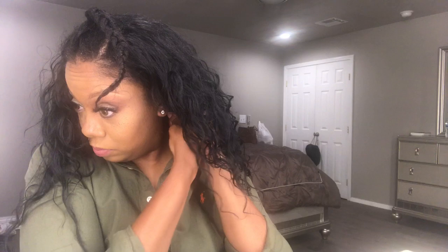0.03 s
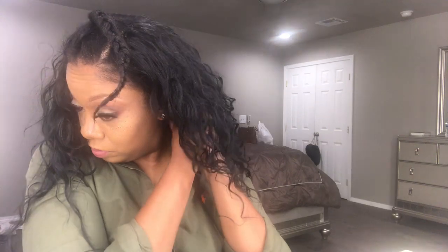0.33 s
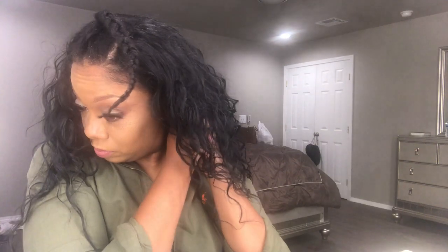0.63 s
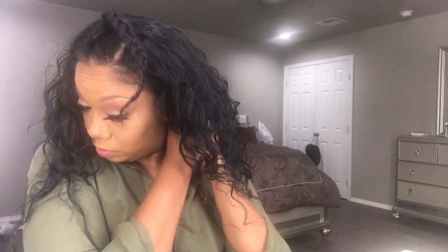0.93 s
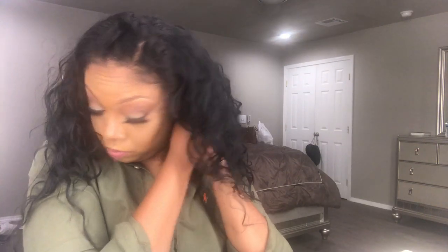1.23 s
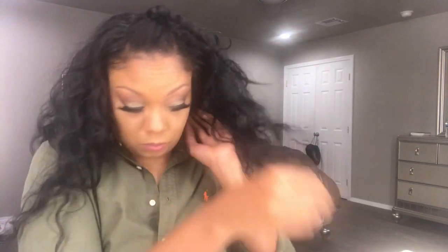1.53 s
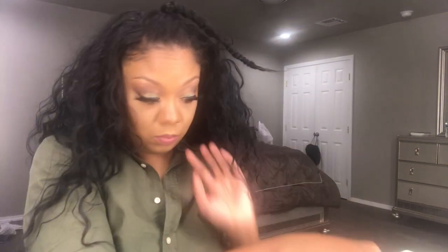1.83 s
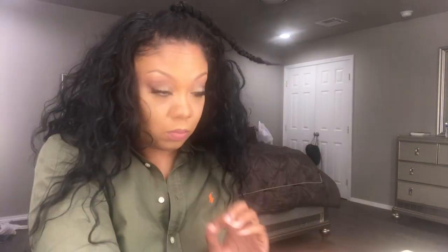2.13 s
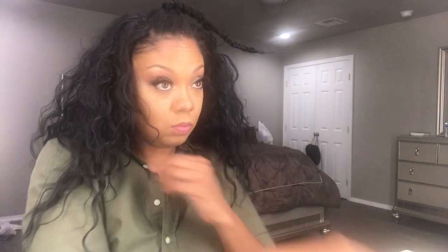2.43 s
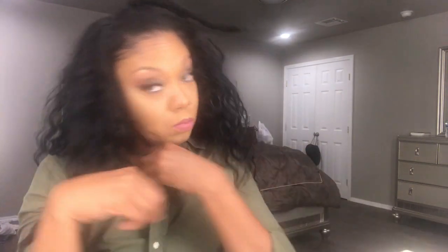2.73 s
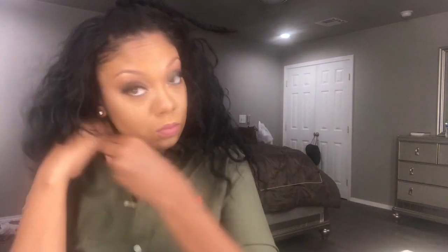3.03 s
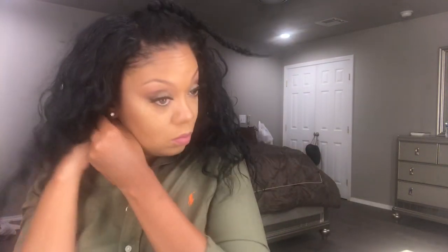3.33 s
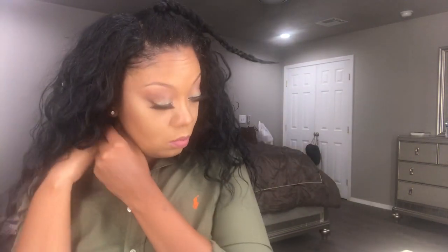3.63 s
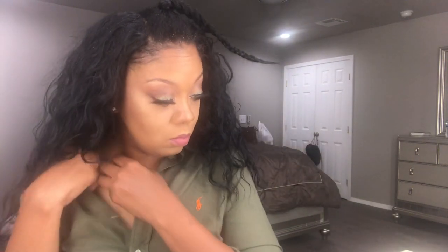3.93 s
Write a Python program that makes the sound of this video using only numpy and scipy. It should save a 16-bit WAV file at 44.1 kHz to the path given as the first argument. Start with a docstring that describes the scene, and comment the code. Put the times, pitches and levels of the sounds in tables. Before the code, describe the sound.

Soft rustling of hair and shirt sleeves being handled in a quiet, humming bedroom.

```python
"""A quiet bedroom: low rumble, a faint appliance hum and microphone hiss run throughout.
Someone gathers long hair at one side of the neck, and strands hiss through the fingers.
Just after 2 s something small clinks twice. Shirt sleeves rub as the arms cross over, and around 3 s
nails and buttons tick, nails scrape and the arms bump softly against the body.
The last strokes gather the hair on the other side."""
import sys
import numpy as np
from scipy import signal
from scipy.fft import rfft, irfft
from scipy.io import wavfile
from scipy.ndimage import uniform_filter1d

SR = 44100
rng = np.random.default_rng(int(sys.argv[2]) if len(sys.argv) > 2 else 0)


def store_wav(level_fs):
    """Save 16-bit WAV to argv[1]."""
    pcm = np.round(np.clip(np.atleast_2d(level_fs), -1, 1) * 32767)
    wavfile.write(sys.argv[1], SR, pcm.T.astype(np.int16))


N = 176400


def amp(db):
    """Decibels to gain."""
    return 10 ** (np.asarray(db) / 20)


def unit(x):
    """Scales to rms 1."""
    return x / np.sqrt(np.mean(x ** 2) + 1e-20)


def curve(points):
    """Joins (time_s, value) points by straight lines."""
    return np.interp(np.arange(N) / SR, *np.transpose(points))


def colour(x, points):
    """EQ through (freq_hz, gain_db) points."""
    hz, db = np.transpose(points)
    gain_db = np.interp(np.log(np.fft.rfftfreq(N, 1 / SR) + 1), np.log(hz), db)
    return irfft(rfft(x) * amp(gain_db), N)


def drift(rate_hz):
    """Random wander of rms 1 up to about the given rate."""
    lowpass = np.exp(-(np.fft.rfftfreq(N, 1 / SR) / rate_hz) ** 2)
    return unit(irfft(rfft(rng.standard_normal(N)) * lowpass, N))


def tone(hz):
    """A sine of rms 1 that follows a pitch curve."""
    return np.sqrt(2) * np.sin(2 * np.pi * (np.cumsum(hz) / SR + rng.random()))


def add(mix, start_s, sound):
    """Mixes a sound in at a time."""
    part = mix[round(start_s * SR):][:len(sound)]
    part += sound[:len(part)]


def bedroom(x, wet_db, t60_s=0.36):
    """The room answers with a short, soft tail after a 4 ms pre-delay."""
    t = np.arange(SR // 2) / SR
    tail = rng.standard_normal(len(t)) * amp(-60 * t / t60_s) * (t > .004)
    return x + amp(wet_db) * signal.fftconvolve(x, tail / np.linalg.norm(tail))[:N]


def reflections(x, share=0.067, latest_s=.009, count=8):
    """Echoes from nearby surfaces ripple the rustle's spectrum."""
    hz = np.fft.rfftfreq(N, 1 / SR)
    delays = rng.uniform(0.000999, latest_s, size=count)
    signs = rng.choice([-1, 1], size=count)
    echoes = sum(sign * np.exp(-2j * np.pi * hz * delay) for delay, sign in zip(delays, signs))
    return irfft(rfft(x) * (1 + share * echoes), N) / np.sqrt(1 + count * share ** 2)


# EQ of the room tone: freq_hz, gain_db
ROOM_EQ = [(20, -37), (33, -29), (45, 4), (65, -7), (85, -3), (100, -4), (140, -8.5), (190, -18.5),
           (280, -22.5), (550, -28.5), (800, -30.5), (1100, -31), (1800, -35), (2800, -38.5), (4000, -40),
           (8000, -43.5), (15500, -43)]


def room_tone(level_db=-57):
    """A steady, bass-heavy bed of room air and microphone hiss."""
    return amp(level_db) * unit(colour(rng.standard_normal(N), ROOM_EQ))


# Level rides of the deep and the upper room resonance: time_s, level_db
DEEP_RUMBLE_RIDE = [(0, -49), (.6, -55), (.81, -47), (.91, -53), (.99, -43.5), (1.2, -50), (1.5, -51.5),
                    (1.85, -61.5), (2.13, -44.5), (2.35, -56.5), (2.57, -51), (2.75, -53.5), (3.15, -60),
                    (3.35, -43.5), (3.62, -53), (4, -52)]
UPPER_RUMBLE_RIDE = [(0, -51), (.4, -65), (.75, -56.5), (1.35, -54), (1.7, -62), (2.4, -61), (3.1, -59.5),
                     (3.5, -61), (4, -61.5)]


def rumble(deep_hz=51.6, upper_hz=80.27, wander_hz=5.03, flutter_db=2.0):
    """Two narrow room resonances wander in pitch and flutter in level."""
    return sum(tone(hz + wander_hz * drift(14.5)) * amp(curve(ride) + flutter_db * drift(9.8))
               for hz, ride in [(deep_hz, DEEP_RUMBLE_RIDE), (upper_hz, UPPER_RUMBLE_RIDE)])


# Partials of the hum: pitch_hz, level_db, waver_hz
HUM_PARTIALS = [(118.54, -65, 1.4), (237.6, -79.5, 1), (332.7, -82.5, 3), (420, -86.5, 4),
                (467, -85.5, 1.3), (575, -87.5, 7.97), (784, -76, 1.5), (1014, -85.5, 3.54)]


def appliance_hum():
    """An appliance drones at a steady level, each partial wavering slightly in pitch."""
    return sum(amp(db) * tone(hz + waver * drift(8)) for hz, db, waver in HUM_PARTIALS)


# Soft body thuds: start_s, level_db, pitch_hz
ARM_BUMPS = [(2.866, -47, 145), (3.057, -54, 131), (3.191, -51, 104)]


def arm_bumps(rise_s=0.0048, overtone=0.31):
    """Arms meet the body in dull, quickly damped thuds."""
    out, t = np.zeros(N), np.arange(SR // 4) / SR
    envelope = t / rise_s * np.exp(1 - t / rise_s)
    for start, db, hz in ARM_BUMPS:
        phase = 2 * np.pi * hz * t
        add(out, start, amp(db) * envelope * (np.sin(phase) + overtone * np.sin(2.25 * phase)))
    return out


# Light clinks: start_s, level_db
CLINK_HITS = [(2.088, -71), (2.174, -56.5)]
# The ring of each clink: pitch_hz, gain_db, t60_s
RING_MODES = [(2140, 3.5, 0.032), (2440, -6, 0.046), (2872, -2, 0.12), (2960, -11, .15),
              (3210, -0.5, 0.032), (4520, -15, .15), (5300, -13, .04)]


def clinks(snap_db=-2, snap_s=0.0027):
    """A small hard object, perhaps jewellery, is knocked: a tiny snap and a brief high ring."""
    out, t = np.zeros(N), np.arange(SR // 2) / SR
    for start, db in CLINK_HITS:
        ring = sum(amp(gain - 60 * t / t60) * np.sin(2 * np.pi * (hz * t + rng.random()))
                   for hz, gain, t60 in RING_MODES)
        soft_noise = unit(uniform_filter1d(rng.standard_normal(len(t)), size=4))
        snap = amp(snap_db) * np.exp(-t / snap_s) * soft_noise
        add(out, start, amp(db) * (ring + snap))
    return out


# Nail and button ticks: start_s, level_db, centre_hz, width_octaves, t60_s
TICK_HITS = [(2.372, -64.5, 1500, 0.67, 0.045), (2.771, -56.5, 1720, .5, 0.018),
             (2.871, -60.5, 1800, 0.46, 0.18), (3.022, -52, 14300, 0.091, 0.015),
             (3.045, -54, 2600, 1.07, 0.013), (3.095, -57.5, 440, 0.13, 0.053)]


def ticks(attack_s=.0005, hold_s=.003):
    """Fingernails and buttons tap, each a short noise burst in its own band."""
    out, t = np.zeros(N), np.arange(8192) / SR
    hz = np.fft.rfftfreq(len(t), 1 / SR) + 1
    for start, db, centre, width, t60 in TICK_HITS:
        band = np.exp(-.5 * (np.log2(hz / centre) / width) ** 2)
        burst = unit(irfft(rfft(rng.standard_normal(len(t))) * band))
        envelope = np.minimum(t / attack_s, 1) * amp(db - 60 * np.maximum(t - hold_s, 0) / t60)
        add(out, start, burst * envelope)
    return out


# Thin scrapes: start_s, length_s, level_db, centre_hz, width_hz
NAIL_SCRAPES = [(.31, .07, -79, 8000, 250), (0.399, 0.014, -75, 3400, 160), (0.509, .025, -79, 3400, 160),
                (.512, .025, -77, 5870, 500), (1.367, 0.075, -75.5, 2270, 130),
                (1.35, .09, -74, 14100, 800), (2.865, 0.034, -64, 3420, 110),
                (2.869, 0.022, -70, 4400, 150), (2.906, 0.051, -69, 4280, 180),
                (2.954, 0.032, -69, 3170, 150)]


def nail_scrapes(fade_share=.3):
    """Nails skid along hair and cloth; quick, nearly regular slips give a fuzzy pitch."""
    out, hz = np.zeros(N), np.fft.rfftfreq(8192, 1 / SR)
    for start, length, db, centre, width in NAIL_SCRAPES:
        phases = np.exp(2j * np.pi * rng.random(len(hz)))
        band = irfft(phases / (1 + ((hz - centre) / width) ** 2))
        compressed = band / np.sqrt(abs(signal.hilbert(band)))  # 2:1, for a fairly even strength
        scrape = unit(compressed[:round(length * SR)])
        add(out, start, amp(db) * scrape * signal.windows.tukey(len(scrape), fade_share))
    return out


def friction(slips_per_s, spread_db, hiss, clump_db, clump_hz):
    """Tiny fibre slips of uneven size over a smooth sliding hiss, swelling in clumps."""
    sizes = amp(spread_db * np.minimum(rng.exponential(1, N), 4))
    slips = (rng.random(N) < slips_per_s / SR) * sizes * rng.choice([-1., 1.], N)
    return (unit(slips) + hiss * rng.standard_normal(N)) * amp(clump_db * drift(clump_hz))


# Level ride of the sleeves, louder for faster arms: time_s, level_db
SLEEVE_RIDE = [(0, -82.5), (1.25, -75), (1.42, -70.5), (1.6, -73.5), (1.78, -68.5), (1.95, -66),
               (2.12, -72.5), (2.28, -73.5), (2.48, -67.5), (2.6, -63.5), (2.77, -57.5), (2.96, -63),
               (3.06, -61.5), (3.2, -66), (3.3, -64.5), (3.38, -71.5), (3.6, -73), (3.8, -65), (4, -59.5)]
# EQ of the shirt cloth: freq_hz, gain_db
CLOTH_EQ = [(60, -30), (120, 7), (230, -10.5), (450, -6.5), (600, -7), (800, -5), (1000, -.5), (1220, 0.5),
            (1550, -6), (2150, -6.5), (2780, -11), (3700, -9.5), (4700, -11.5), (6000, -15.5),
            (8000, -16.5), (10000, -19.5), (15500, -19)]


def sleeves():
    """Cloth rubs on cloth as the arms move."""
    rub = friction(slips_per_s=2500, spread_db=3, hiss=1.01, clump_db=0.63, clump_hz=38)
    return unit(colour(rub, CLOTH_EQ)) * amp(curve(SLEEVE_RIDE))


# Strokes through the hair: peak_s, rise_s, fall_s, level_db, tilt_db_per_octave
HAIR_STROKES = [(.23, 0.12, 0.079, -75, 2.5), (.36, 0.071, 0.036, -70, 2.5), (.408, .012, 0.011, -69, -1.5),
                (.518, 0.015, 0.013, -70.5, 2), (1.15, .1, 0.13, -85, 3), (1.365, .03, 0.03, -67, 2),
                (1.425, 0.014, 0.035, -72.5, 1.5), (1.75, 0.26, 0.11, -73.5, -1.5),
                (2.67, 0.17, 0.09, -71.5, .5), (3.07, 0.075, 0.072, -66.5, -1),
                (3.69, 0.031, 0.026, -72, -0.5), (3.96, 0.16, .1, -65.5, -1.5)]
# EQ of sliding hair, before each stroke's tilt: freq_hz, gain_db
HAIR_EQ = [(300, -11), (1200, 2.5), (2250, -3.5), (2700, -0.5), (3400, 2.5), (4500, 0), (6000, -2),
           (9000, -3), (12000, -2), (15500, -4.5)]


def hair(pivot_hz=5000):
    """Each stroke swells and fades as strands slide through the fingers."""
    out, t = np.zeros(N), np.arange(N) / SR
    rub = friction(slips_per_s=2800, spread_db=2.5, hiss=1.1, clump_db=0.8, clump_hz=60)
    for peak, rise, fall, db, tilt in HAIR_STROKES:
        tilted_eq = [(hz, gain + tilt * np.log2(hz / pivot_hz)) for hz, gain in HAIR_EQ]
        swell = np.exp(-.5 * ((t - peak) / np.where(t < peak, rise, fall)) ** 2)
        out += unit(colour(rub, tilted_eq)) * amp(db) * swell
    return out


def scene():
    """The mono mix: handling sounds and drier ticks in the bedroom, over the background bed."""
    handling = reflections(sleeves() + hair()) + nail_scrapes() + arm_bumps() + clinks()
    foreground = bedroom(handling, wet_db=-9) + bedroom(ticks(), wet_db=-14)
    return (foreground + room_tone() + rumble() + appliance_hum())[None]


# Response of the microphone: freq_hz, gain_db
MICROPHONE_EQ = [(22, -16), (36, -7), (46, 0), (3000, -1.5), (3400, 0), (4600, -1), (5000, -3.5), (5600, 1),
                 (6800, 1), (7600, -2), (9200, 0.5), (9900, -1.5), (10400, -5), (11100, -1), (15500, -4.5)]


def record(dry):
    """The microphone thins the sub-bass and ripples the treble; a steep high cut follows."""
    high_cut = signal.firwin(1023, cutoff=15750, window=("kaiser", 9), fs=SR)
    return signal.oaconvolve(colour(dry[0], MICROPHONE_EQ), high_cut, "same")[None]


dry = scene()
out = record(dry)
store_wav(out)
```